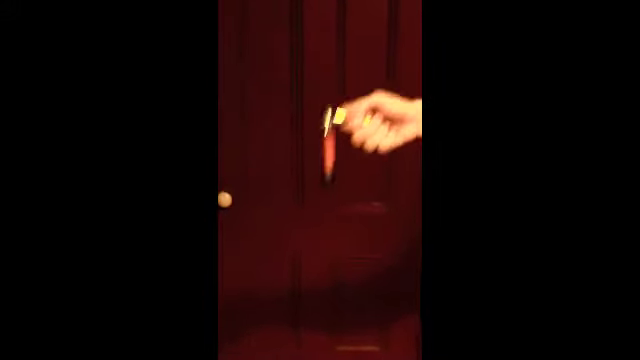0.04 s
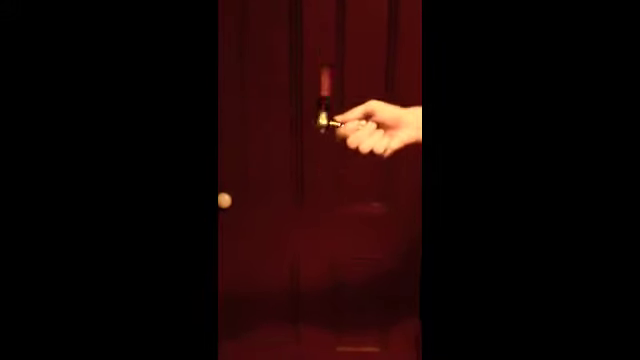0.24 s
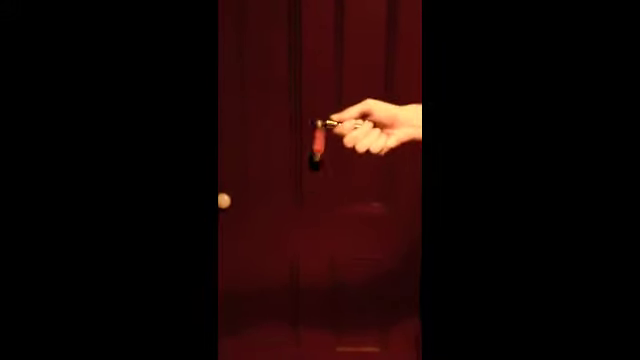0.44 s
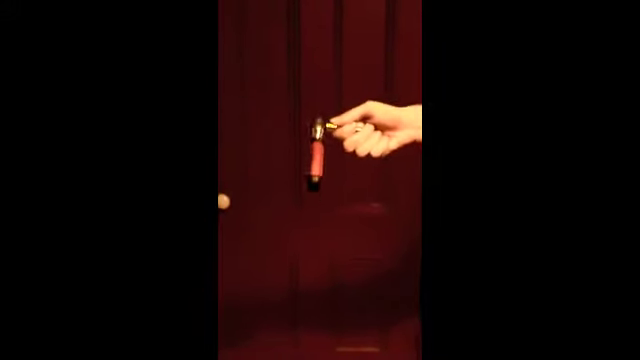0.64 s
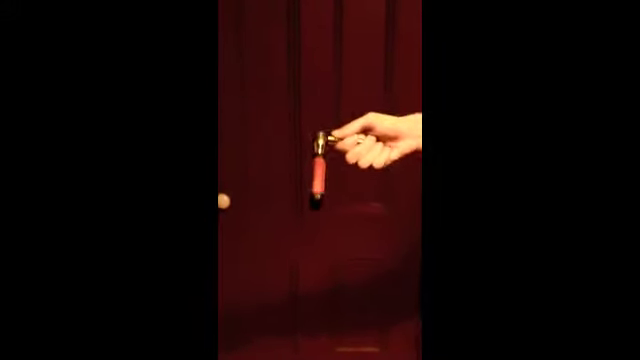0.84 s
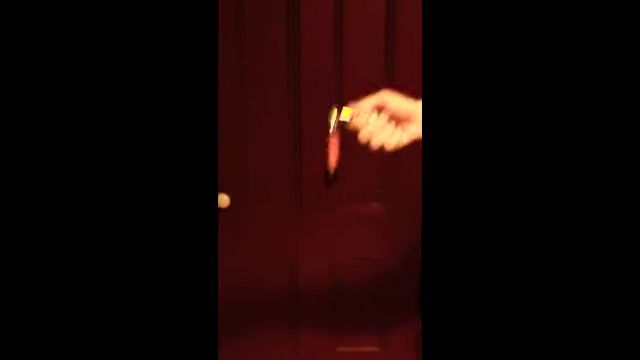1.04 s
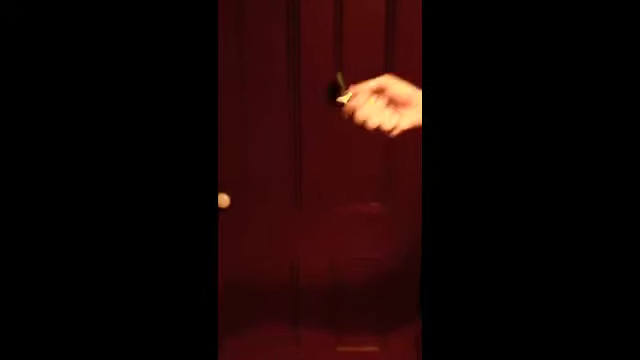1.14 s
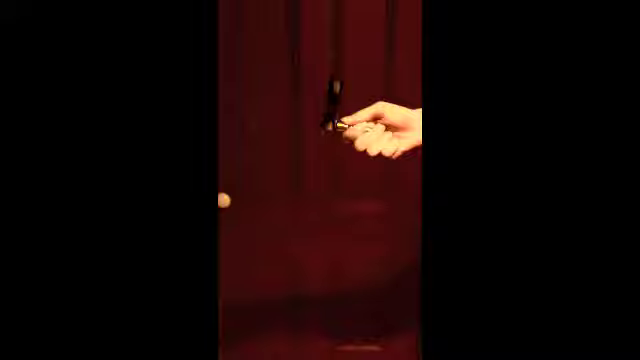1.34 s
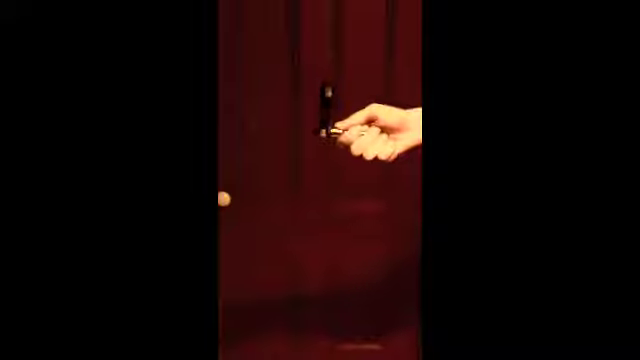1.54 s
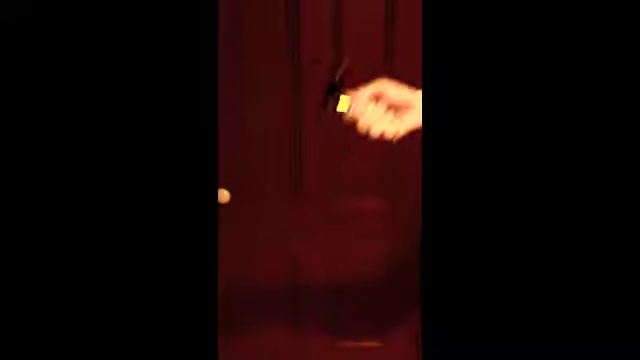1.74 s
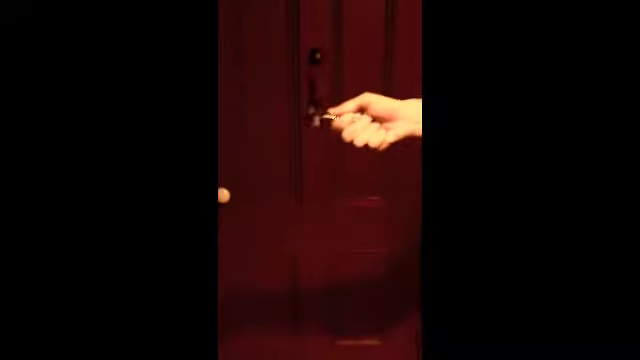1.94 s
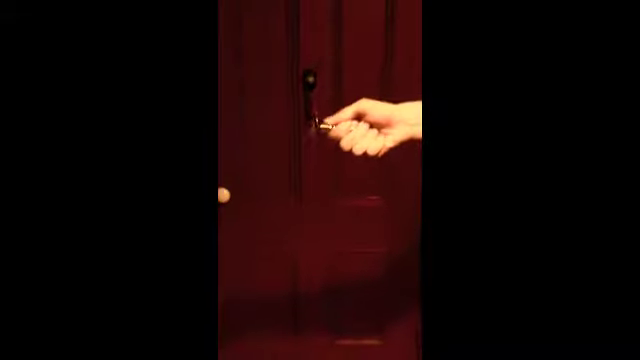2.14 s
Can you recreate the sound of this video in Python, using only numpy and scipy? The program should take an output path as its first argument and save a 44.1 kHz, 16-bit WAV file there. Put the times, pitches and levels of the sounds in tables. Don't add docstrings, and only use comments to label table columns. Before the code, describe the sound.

Fast bright ratchet clicking in a long spin, a shorter spin, and one sharp steel knock

```python
import sys
import numpy as np
from scipy import signal
from scipy.fft import rfft, irfft
from scipy.io import wavfile

SR = 44100
rng = np.random.default_rng(int(sys.argv[2]) if len(sys.argv) > 2 else 0)


def natural_amplitude(level_db):
    exponent = np.asarray(level_db, float) / 20
    return 10 ** exponent


def master_out(mix):
    frames = np.transpose(np.atleast_2d(mix))
    ceiling = np.clip(frames, -1, 1)
    pcm = np.round(ceiling * 32767).astype(np.int16)
    wavfile.write(sys.argv[1], SR, pcm)


N = 97020

# start in seconds, tick in dB,
# rebound delay in ms, rebound in dB.
FIRST_TWIRL_TEETH = [(.1811, -18, 3.4, -17), (.1937, -21, 2.7, -17), (.2022, -19, 2.4, -22),
                     (.2146, -19, 2.0, -18), (.2227, -15, 3.0, -14), (.2357, -16, 2.0, -15),
                     (.2442, -18, 2.4, -13), (.2537, -15, 2.0, -15), (.2591, -16, 2.0, -22),
                     (.2683, -16, 1.5, -14), (.2776, -20, 2.7, -18), (.2901, -13, 2.4, -14),
                     (.2967, -17, 2.0, -23), (.3067, -17, 2.2, -17), (.3205, -16, 1.8, -13),
                     (.3294, -11, 1.9, -16), (.3380, -10, 2.5, -14), (.3457, -13, 2.9, -17),
                     (.3524, -14, 2.0, -22),
                     (.3596, -14, 1.5, -18), (.3643, -12, 1.8, -16), (.3693, -13, 2.0, -22),
                   (.3776, -20, 4.0, -19), (.3856, -14, 1.5, -14), (.3954, -15, 1.9, -15),
                   (.4049, -17, 2.4, -16), (.4163, -16, 1.5, -13), (.4203, -15, 2.0, -23),
                   (.4268, -18, 1.6, -12), (.4352, -14, 2.0, -22), (.4419, -15, 1.4, -17),
                   (.4506, -18, 2.2, -18), (.4600, -19, 2.1, -17), (.4709, -17, 4.0, -20),
                   (.4839, -16, 2.4, -16), (.4980, -20, 1.2, -24), (.5117, -16, 1.6, -20)]
# start in seconds, tick in dB, rebound delay in ms,
# rebound in dB.
SECOND_TWIRL_TEETH = [
    (1.2066, -21, 2.6, -20),
    (1.2133, -26, 2.0, -30),
    (1.2191, -23, 2.7, -22),
    (1.2297, -22, 3.0, -20),
    (1.2400, -17, 2.0, -16),
    (1.2456, -14, 2.0, -24),
    (1.2534, -15, 2.3, -22),
    (1.2699, -19, 2.4, -21),
    (1.2933, -19, 2.8, -25),
    (1.3186, -19, 1.2, -26),
]
# start in seconds, level in dB, brightest band in Hz.
LOOSE_TICKS = [(.1652, -31, 6000), (.1706, -41, 4000), (1.1844, -44, 10000), (1.1927, -34, 7000),
               (1.2026, -33, 5500), (1.8106, -45, 2600), (1.8278, -31, 8500), (1.8387, -46, 5200),
               (1.8711, -35, 2500), (1.8728, -40, 3500), (1.8745, -41, 7000), (1.8774, -38, 7000),
               (1.8795, -41, 4000), (1.8815, -41, 5000), (2.1351, -47, 6000)]
# time in seconds, frequency in Hz.
FACING_HZ = [(.18, 4400), (.23, 6430), (.26, 5600), (0.288, 5230), (.32, 8350), (.36, 7200), (.40, 6300),
             (.43, 4970), (.47, 4800), (0.483, 8240), (.51, 7350), (1.2, 5360), (1.24, 5600), (1.27, 6500),
             (1.32, 7250)]
# time in seconds, level in dB.
GRIP_DB = [(.16, 4), (.19, 1), (.22, 4), (.3, 1), (.43, 1), (.47, 7), (.52, 9), (1.2, -4), (1.26, -2),
           (1.28, 3), (1.32, 7), (1.8, -2)]
# frequency in Hz, level in dB, t60 in seconds.
HEAD_MODES = [(1285, -15, 0.0044), (1820, -18.5, 0.011), (2500, -8, 0.0046), (3445, -0.5, 0.0023),
              (4305, -1.5, .0035), (5310, -3, 0.0028), (6170, -5, 0.005), (7200, 0.5, 0.0029),
              (8500, -1.5, 0.0029), (9640, -1, 0.0016), (11460, -5, 0.0028), (12320, -5, 0.0015),
              (12780, -4.5, 0.0035), (15240, -6.5, 0.0016)]
# frequency in Hz, level in dB, t60 in seconds.
HANDLE_MODE = (3080, -20, .026)
# start in seconds, level in dB, brightest band in Hz.
SOCKET_HITS = [
    (1.887, -33, 5400),
    (1.8901, -13, 7800),
    (1.8903, -19, 4300),
    (1.8910, -24, 8000),
    (1.8924, -18, 4200),
    (1.8930, -21, 6800),
]
# frequency in Hz, level in dB, t60 in seconds.
SOCKET_MODES = [(1050, -30, .006), (1350, -32, .006), (1800, -30, .008), (2400, -16, .004),
                (3000, -14, .004), (3935, -6, .0035), (4300, -24, .015), (5100, -7, .003), (6100, -4, .003),
                (7300, -2, .004), (8100, -4, .004), (9600, -15, .003), (11600, -1, .003),
                (14000, -12, .002)]
# frequency in Hz, level in dB per Hz.
BLOW_SPECTRUM = [(500, -15), (1000, -6), (1900, -4.5), (3200, 4), (4300, 3.5), (7000, -0.5), (10000, -6),
                 (16000, -12)]
# start in seconds,
# level in dB, frequency in Hz, t60 in seconds.
SINGLE_RINGS = [(.0885, -50, 10800, .005), (.089, -49, 5300, .008), (.090, -49, 1410, .05),
                (.1652, -42, 3300, .006), (1.094, -54, 10800, .006), (1.496, -55, 11000, .006),
                (1.7447, -47, 5440, .012), (1.8278, -42, 3090, .006), (1.8278, -42, 4200, .005),
                (1.8843, -35, 2800, .008), (1.885, -39, 1250, .012), (1.8902, -34, 4280, .025),
                (1.8902, -40, 1820, .025), (1.8905, -40, 1020, .012), (1.8882, -33, 2950, .008),
                (2.0125, -37, 1850, .008), (2.0125, -35, 3060, .009), (2.0125, -39, 2450, .004)]
# time in seconds, level in dB.
ROOM_SEND_DB = [(.1, -46), (0.181, 6), (.25, 0.5), (.34, -2.5), (.43, 2), (.5, -2), (1.2, 7.5), (1.25, 1),
                (1.33, -7), (1.8, -2), (1.85, -5), (1.875, 13), (1.892, -2.5), (2.1, 4)]
# delay in ms, level in dB.
FIRST_ECHOES = [(3.9, -20), (7.4, -14), (9.2, -15), (11.5, -9), (13.1, -15), (16.5, -15), (22.8, -14)]
# frequency in Hz, t60 in seconds.
ROOM_T60 = [(1000, .5), (2000, .46), (3000, .46), (5000, .44), (8000, .4), (11000, .35), (16000, .28)]
# frequency in Hz, level in dB per Hz.
AIR_SPECTRUM = [(30, -41), (90, -16.5), (384, -7.5), (1000, -12.5), (3000, -21.5), (7000, -27),
                (10000, -34), (16000, -35.5)]
# frequency in Hz, width in Hz, rms level in dB.
DUCT_TONES = [(207, 7, -68), (246.7, 34, -67), (290.3, 34, -63.5), (373, 52, -62.5), (584.6, 12, -71.5),
              (1230, 110, -75), (4550, 1000, -73), (4930, 240, -76)]
# frequency in Hz, rms level in dB.
MAINS_HUM = [(59.5, -77), (119.5, -71)]

CONTACT_GAIN_DB = 2
FACING_DB, LOOSE_FACING_DB, FACING_WIDTH_OCT = 7.5, 23, 0.21
CHATTER_PER_TOOTH, CHATTER_DB, CHATTER_MS = 6, -15.5, 5
SCATTER_DB, DETUNE_RATIO = 2.5, .06
ONE_SIDE, ALL_SIDES = 0.81, .25


def ratchet(sides):
    out = np.zeros(N)
    when_s, facing_hz = np.transpose(FACING_HZ)
    for s, db, delay_ms, rebound_db in FIRST_TWIRL_TEETH + SECOND_TWIRL_TEETH:
        hz = np.interp(s, when_s, facing_hz)
        add(out, s, pawl_contact(s, db, hz, FACING_DB, sides))
        add(out, s + delay_ms / 1000, pawl_contact(s, rebound_db, .9 * hz, FACING_DB, sides))
        for late, weak in rng.random((CHATTER_PER_TOOTH, 2)):
            chatter = pawl_contact(s, db + CHATTER_DB - 6 * weak, hz, FACING_DB, sides)
            add(out, s + late * CHATTER_MS / 1000, chatter)
    for s, db, hz in LOOSE_TICKS:
        add(out, s, pawl_contact(s, db, hz, LOOSE_FACING_DB, sides))
    return without_bass(out, 1500)


def pawl_contact(s, db, bright_hz, facing_db, sides):
    t = np.arange(1500) / SR
    handle_hz, handle_db, t60 = HANDLE_MODE
    grip_db = np.interp(s, *np.transpose(GRIP_DB))
    handle = natural_amplitude(handle_db + grip_db - 60 * t / t60) * np.sin(2 * np.pi * handle_hz * t)
    handle = handle * rng.uniform(.3, 1.4)
    head = ring_steel(HEAD_MODES, bright_hz, facing_db, sides)
    return natural_amplitude(db + CONTACT_GAIN_DB) * (head + handle)


def ring_steel(modes, bright_hz, facing_db, sides):
    hz, mode_db, t60 = np.transpose(modes)[:, :, None]
    chance = rng.standard_normal((3, len(modes), 1))
    t = np.arange(900) / SR
    lift_db = facing_db * np.exp(-(np.log2(hz / bright_hz) / FACING_WIDTH_OCT) ** 2)
    scatter_db = sides * SCATTER_DB * np.clip(chance[0], -2, 2)
    level = natural_amplitude(mode_db + np.sqrt(sides) * lift_db + scatter_db)
    hz = hz * (1 + sides * DETUNE_RATIO * chance[1] * np.minimum(.004 / t60, 1))
    phase = np.pi * np.arange(len(modes))[:, None] + 1.5 * sides * chance[2]
    partials = level * natural_amplitude(-60 * t / t60) * np.sin(2 * np.pi * hz * t + phase)
    sound = partials.sum(0) * np.minimum(t / .00015, 1)
    return np.pad(sound / abs(sound).max(), (0, 600))


def without_bass(x, cutoff_hz):
    return signal.sosfilt(signal.butter(3, cutoff_hz, "high", fs=SR, output="sos"), x)


def socket_knock():
    out = np.zeros(N)
    for s, db, hz in SOCKET_HITS:
        add(out, s, natural_amplitude(db + CONTACT_GAIN_DB) * ring_steel(SOCKET_MODES, hz, FACING_DB, 1))
    return without_bass(out, 3000)


def knock_into_room():
    out = np.zeros(N)
    blow = irfft(natural_amplitude(read(BLOW_SPECTRUM, np.fft.rfftfreq(256, 1 / SR))))
    blow = np.roll(blow, 32)
    add(out, 1.8902 - 32 / SR, natural_amplitude(-1.5) * blow / np.linalg.norm(blow))
    return out


def single_rings():
    out = np.zeros(N)
    t = np.arange(3000) / SR
    for s, db, hz, t60 in SINGLE_RINGS:
        add(out, s, natural_amplitude(db - 60 * t / t60) * np.sin(2 * np.pi * hz * t) * np.minimum(t / .0005, 1))
    return out


def room(x):
    build_s, tail_db = .008, -2.5
    t = np.arange(SR) / SR
    hz, frame_s, z = signal.stft(rng.standard_normal(SR), SR, nperseg=128)
    decay = natural_amplitude(-60 * frame_s / read(ROOM_T60, hz)[:, None])
    tail = signal.istft(z * decay, SR, nperseg=128)[1][:SR]
    tail = tail * np.minimum(t / build_s, 1) ** 2
    response = natural_amplitude(tail_db) * tail / np.linalg.norm(tail)
    for k, (ms, db) in enumerate(FIRST_ECHOES):
        add(response, ms / 1000, np.array([(-1) ** k * natural_amplitude(db)]))
    return signal.fftconvolve(x, response)[:N]


def ventilation():
    hz, t = np.fft.rfftfreq(N, 1 / SR), np.arange(N) / SR
    out = natural_amplitude(-55.5) * shaped_noise(natural_amplitude(read(AIR_SPECTRUM, hz)))
    for f, width_hz, db in DUCT_TONES:
        out = out + natural_amplitude(db) * shaped_noise(1 / (1 + (2 * (hz - f) / width_hz) ** 2))
    for f, db in MAINS_HUM:
        out = out + np.sqrt(2) * natural_amplitude(db) * np.sin(2 * np.pi * f * t)
    return out


def shaped_noise(gain):
    x = irfft(rfft(rng.standard_normal(N)) * gain, N)
    return x / np.sqrt(np.mean(x ** 2) + 1e-20)


def read(points, hz):
    f, value = np.transpose(points)
    return np.interp(np.log(hz + 1), np.log(f + 1), value)


def add(mix, s, sound):
    part = mix[round(s * SR):][:len(sound)]
    part += sound[:len(part)]


def scene():
    send = natural_amplitude(np.interp(np.arange(N) / SR, *np.transpose(ROOM_SEND_DB)))
    around = (ratchet(ALL_SIDES) + knock_into_room() + single_rings()) * send
    direct = ratchet(ONE_SIDE) + socket_knock() + single_rings()
    return (direct + room(around) + ventilation())[None]


def top_cut(x):
    return signal.sosfilt(signal.butter(12, 16980, fs=SR, output="sos"), x)


def record(dry):
    edge = signal.firwin(255, 15850, fs=SR)[None]
    mix = signal.oaconvolve(dry, edge, "same")
    return top_cut(mix)


dry = scene()
out = record(dry)
master_out(out)
```